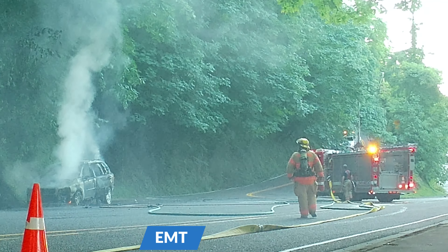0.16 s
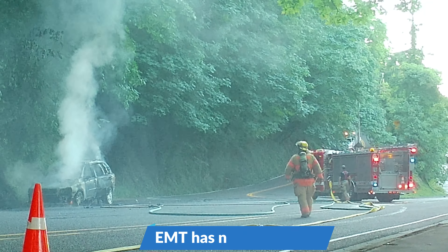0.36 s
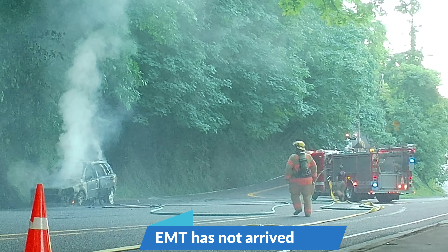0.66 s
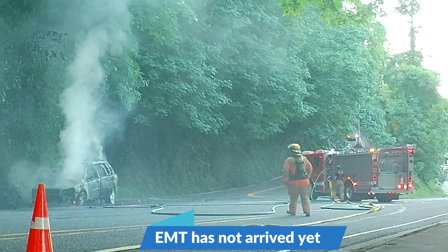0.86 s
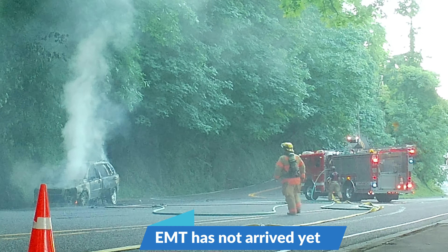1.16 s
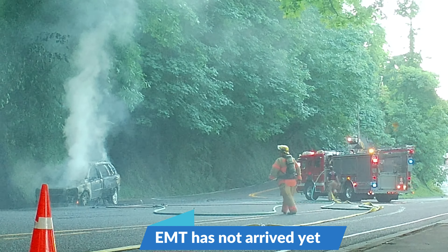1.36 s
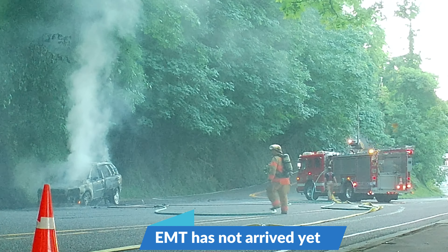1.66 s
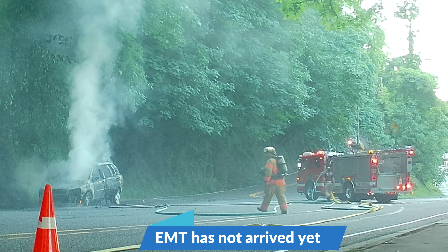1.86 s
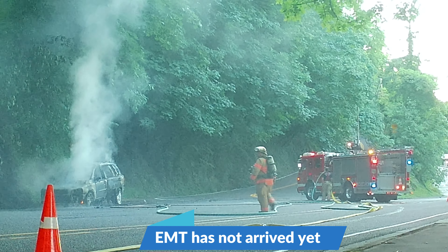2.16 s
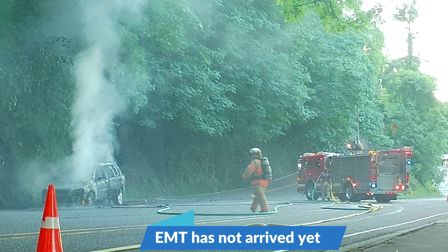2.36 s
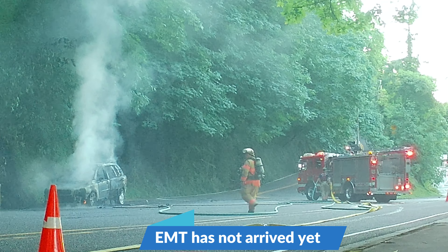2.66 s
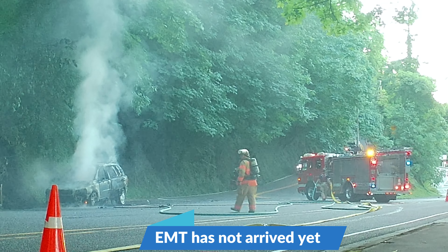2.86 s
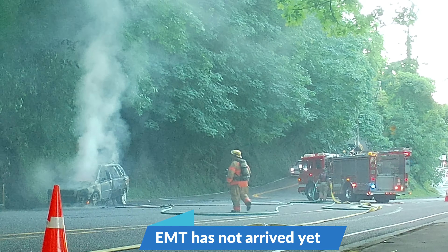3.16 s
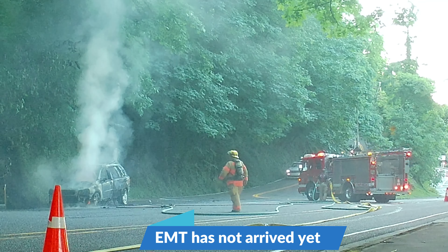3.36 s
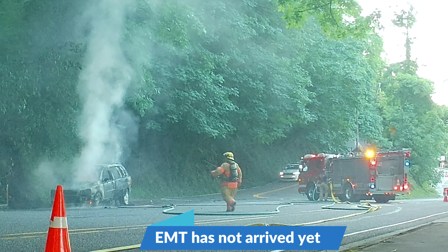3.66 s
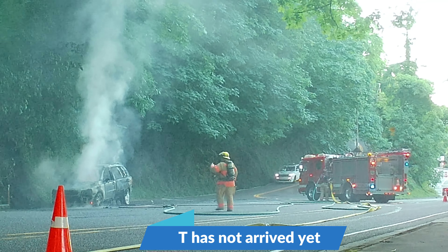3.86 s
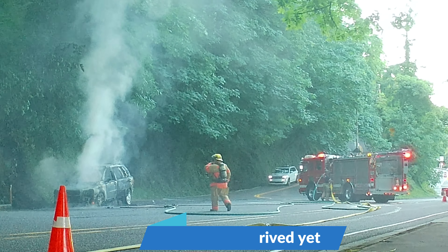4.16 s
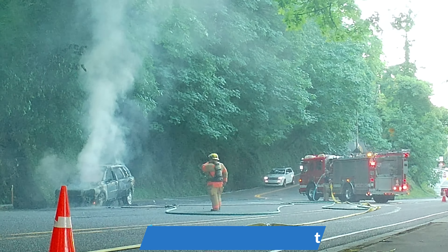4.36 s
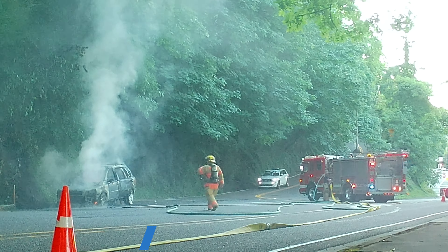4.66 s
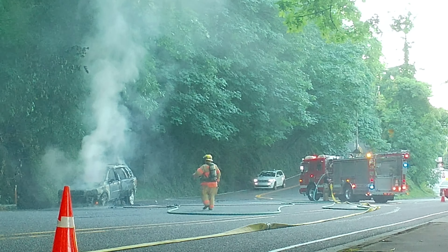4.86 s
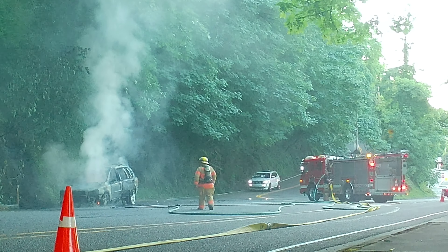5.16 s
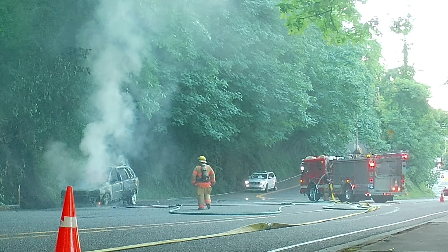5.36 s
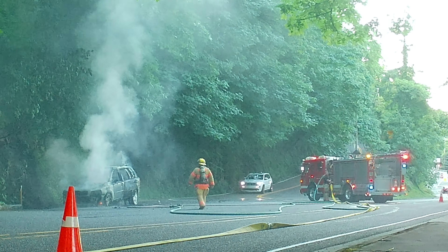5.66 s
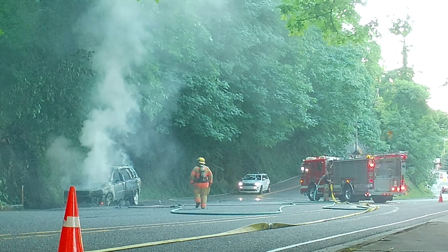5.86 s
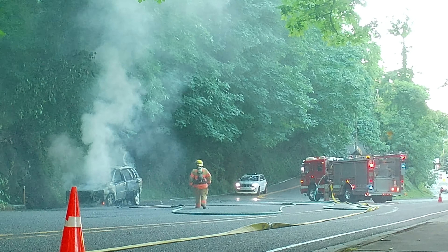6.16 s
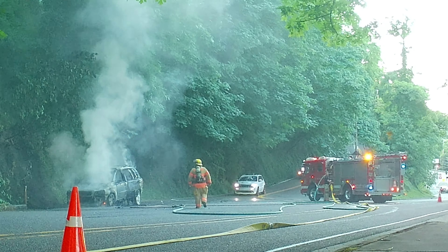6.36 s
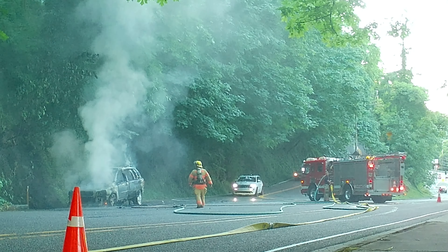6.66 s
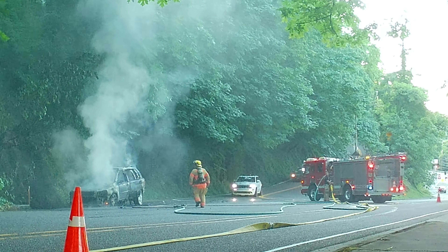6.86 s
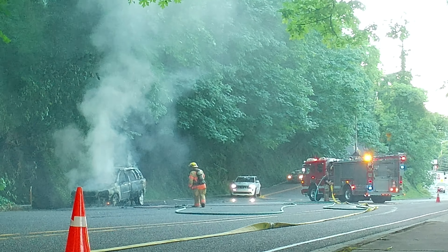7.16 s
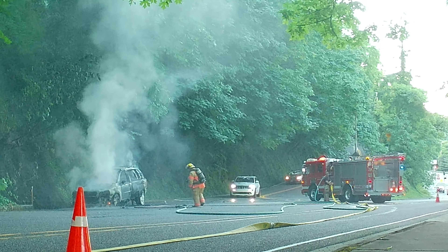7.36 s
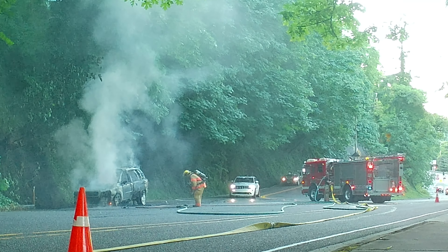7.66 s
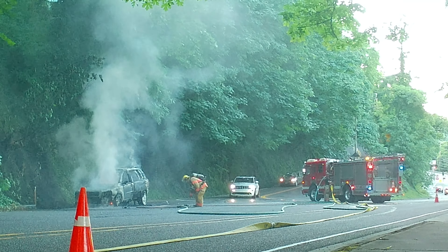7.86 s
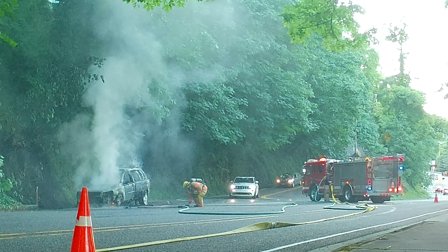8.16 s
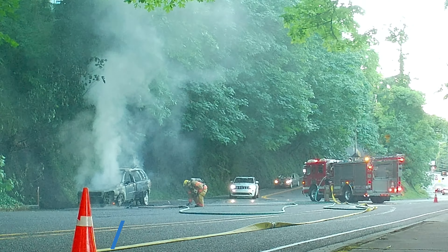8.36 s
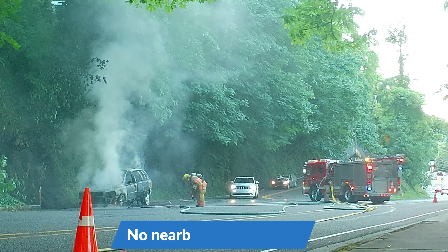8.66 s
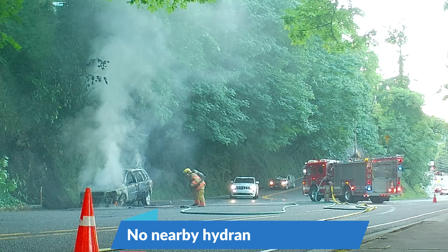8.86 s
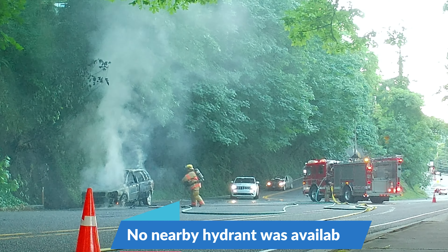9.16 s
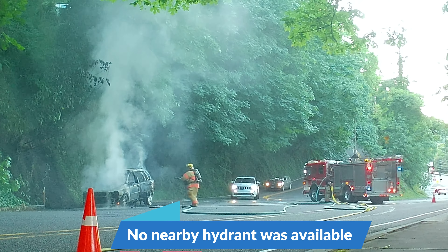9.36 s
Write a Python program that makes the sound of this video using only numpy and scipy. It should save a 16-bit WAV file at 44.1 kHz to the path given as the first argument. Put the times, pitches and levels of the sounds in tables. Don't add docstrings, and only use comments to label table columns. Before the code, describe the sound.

Low even diesel drone and soft hiss outdoors, with a truck's deep throb sinking away, a wavering small motor whine and cars pulling off.

```python
import sys
import numpy as np
from scipy import signal
from scipy.fft import rfft, irfft, next_fast_len
from scipy.io import wavfile
from scipy.ndimage import uniform_filter1d

SR = 44100
rng = np.random.default_rng(int(sys.argv[2]) if len(sys.argv) > 2 else 0)


def amplitude_ratio(level_db):
    exponent = np.asarray(level_db, float) / 20
    return 10 ** exponent


def master(y):
    cut = np.clip(np.atleast_2d(y).T, -1, 1)
    pcm = np.round(cut * 32767)
    wavfile.write(sys.argv[1], SR, pcm.astype(np.int16))


N = 419832
TIME = np.arange(N) / SR

# (time [s], crank speed [turns/s])
DIESEL_SPEED = [(0.0, 21.013), (1.5, 20.99), (3.7, 21.065), (5.2, 21.037), (8.0, 21.076), (9.52, 21.17)]
# (cycles per crank turn), then (level [dB])
MAIN_ORDERS = (3, 6, 9, 76)
MAIN_DB = (-26.5, -36.5, -37.5, -58.5)
# (cycles per crank turn), then (level [dB])
MINOR_ORDERS = (3.5, 4.5, 8, 10.5, 11, 15, 16, 17, 18, 19, 21, 24, 25, 27, 37.5, 40, 42, 45, 48, 49.5, 50.5,
                53, 54, 57, 59, 77.5, 85.5)
MINOR_DB = (-38, -38, -43, -46, -48, -48, -47, -49, -50, -53, -54, -53, -51, -53, -58, -53, -58, -55, -54,
            -57, -59, -58, -58, -61, -55, -68, -69)
# (frequency [Hz], level of one half order [dB])
CLATTER_COLOUR = [(60, -60), (300, -57), (650, -64), (1100, -63), (1350, -67), (1600, -73), (1950, -76),
                  (2200, -83), (4000, -100)]
# (time [s], firing rate [Hz], engine effort [dB])
TRUCK_PASS = [
    (0.0, 47.48, -20),
    (0.95, 47.57, 3),
    (1.35, 46.96, 0.5),
    (2.0, 46.6, 1),
    (2.6, 46.27, -9),
    (3.3, 43.7, -2),
    (4.3, 41.05, -9),
    (5.0, 36.56, -5),
    (5.4, 35.28, -23),
    (6.4, 35.18, -30),
]
# (level [dB]), then (share of the effort swing)
TRUCK_TONE_DB = (-21.5, -28, -30.5)
TRUCK_EFFORT_SHARE = (1.0, .2, .2)
# (frequency [Hz], width [Hz], boost [dB])
EXHAUST_PIPE = [(73.6, 1.6, 12), (83, 3.0, 4), (108, 7.0, -16), (129.5, 8.0, 11)]
# (frequency [Hz], level [dB per Hz])
RUMBLE_SPECTRUM = [(7.1, -45), (12, -3.5), (43, -1.5), (75, -2), (119, -5.5), (275, -13), (337, -13),
                   (427, -26.5), (490, -16), (611, -35.5), (700, -26.5), (910, -44), (1540, -120)]
# (frequency [Hz], level [dB per Hz])
HISS_SPECTRUM = [(240, -43), (400, -1.5), (439, -5), (490, -3), (615, -4.5), (1100, -10), (2180, -24.5),
                 (3000, -31), (3900, -56), (6600, -120)]
# (frequency [Hz], level [dB per Hz])
AIR_SPECTRUM = [(1500, -13), (2600, -4.5), (3300, -3), (4400, -9), (5600, -11), (6900, -12.5), (7600, -15),
                (9000, -17.5), (10500, -17), (11600, -22), (13000, -23.5), (16500, -25)]
# (time [s], level about its mean [dB])
TRAFFIC_NEARNESS = [(0.0, -5.5), (0.7, -3), (1.75, 2.5), (2.15, -2.5), (2.95, -1.5), (3.25, 0), (7.1, 0),
                    (8.0, 1), (9.0, -1.5), (9.52, 0.5)]
# (time [s], level about its mean [dB])
QUEUE_NEARNESS = [(0.0, -3), (2.6, -1.5), (3.7, 0), (6.9, 2), (7.6, 3), (8.7, 3), (9.2, 0.5), (9.52, 1.5)]
# (start [s],
# end [s], first pitch [Hz], last pitch [Hz], peak [dB])
CAR_NOTES = [(.3, 1.5, 39, 41.9, -24.5), (.3, 1.2, 318, 409.3, -33.5), (1.0, 1.6, 555, 470, -39),
             (1.3, 2.0, 490, 482, -36.5), (3.6, 4.3, 116, 112.4, -34), (4.0, 5.2, 20.3, 20.4, -29),
             (4.8, 6.4, 33.6, 36.1, -28), (6.1, 6.9, 86, 81.75, -27.5), (6.5, 7.3, 113, 115.8, -27),
             (6.8, 7.6, 126, 130.3, -24), (7.8, 8.7, 94, 99.7, -20), (7.7, 8.35, 243, 252, -29),
             (2.8, 4.5, 490.5, 491.6, -39.5), (8.6, 9.7, 72, 72.2, -24), (8.1, 8.6, 582, 560, -38),
             (8.5, 9.1, 497, 501, -39), (9.0, 9.9, 27.2, 29.2, -30), (9.0, 9.9, 126, 127, -26.5),
             (9.0, 9.9, 65, 63.6, -30), (9.1, 9.8, 450, 382, -39.5)]
# (start [s], end [s], first pitch [Hz], last pitch [Hz], peak [dB])
CAR_DRONES = [
    (1.0, 2.1, 518, 478, -35.5),
    (6.6, 7.7, 269, 240, -34.5),
    (8.3, 9.0, 214.7, 259.6, -32),
]
# (start [s], end [s], first pitch [Hz], last pitch [Hz], peak [dB])
BRAKE_SQUEALS = [
    (1.4, 2.1, 8150, 8400, -78),
    (1.7, 2.7, 8420, 7920, -72.5),
    (2.3, 2.9, 7900, 7400, -78),
    (4.6, 5.1, 8500, 8600, -78),
    (4.95, 5.8, 8190, 8400, -74.5),
    (4.95, 5.35, 7500, 7520, -77),
    (5.4, 5.85, 7410, 7370, -76),
    (8.85, 9.2, 12050, 12050, -81),
]
# (time [s], pitch [Hz], level [dB])
MOTOR_WHINE = [(1.97, 412, -39), (2.28, 343, -35), (2.47, 324, -36), (2.72, 320, -37), (3.03, 368, -35),
               (3.55, 372, -35), (4.1, 382, -33), (4.36, 369, -34), (4.6, 331, -33), (4.88, 353, -31),
               (5.22, 330, -33), (5.55, 348, -34), (5.8, 326, -35), (6.2, 338, -34.5), (7.7, 357, -34),
               (8.33, 360, -34), (8.5, 347, -28), (8.75, 322, -35)]
WHINE_INERTIA_S = 0.08
SPRAY_FROM_S, SPRAY_FULL_S, SPRAY_DB = 6.8, 9, 2.5


def rms_one(x):
    return x / np.sqrt(np.mean(x ** 2) + 1e-20)


def in_time(rows):
    seconds, *columns = np.transpose(rows)
    return [np.interp(TIME, seconds, column) for column in columns]


def at_hz(points, hz):
    point_hz, point_db = np.transpose(points)
    return np.interp(np.log(hz), np.log(point_hz), point_db)


def ramp(from_s, to_s):
    return np.clip((TIME - from_s) / (to_s - from_s), 0, 1)


def fade(rows, seconds):
    opening = TIME - rows[0][0] + seconds
    closing = rows[-1][0] + seconds - TIME
    return np.clip(np.minimum(opening, closing) / seconds, 0, 1)


def drift(rate):
    r = np.exp(-200 * np.pi * rate / SR)
    noise = rng.standard_normal(N // 100 + 1002)
    slow = signal.lfilter([1], [1, -2 * r, r * r], noise)[1000:]
    return np.interp(np.arange(N) / 100, np.arange(len(slow)), rms_one(slow - slow.mean()))


def tone(turns, level_db):
    return np.sqrt(2) * amplitude_ratio(level_db) * np.sin(2 * np.pi * (turns + rng.random()))


def banded_noise(colour, low_db, high_db, pivot_hz, patchy_db):
    size = next_fast_len(N)
    hz = np.maximum(np.arange(size // 2 + 1) * SR / size, 1)
    shaped = rfft(rng.standard_normal(size)) * amplitude_ratio(at_hz(colour, hz))
    shaped = shaped / np.sqrt(np.mean(irfft(shaped, size) ** 2))
    out = np.zeros(N)
    for centre in 2 ** np.arange(3, 14.6, 0.5):
        share = np.clip(1 - 2 * np.abs(np.log2(hz / centre)), 0, 1)
        blend = np.clip(0.5 + np.log2(centre / pivot_hz) / 2, 0, 1)
        gain_db = (1 - blend) * low_db + blend * high_db + patchy_db * drift(1.0)
        out += amplitude_ratio(gain_db) * irfft(shaped * share, size)[:N]
    return out


def diesel():
    speed, = in_time(DIESEL_SPEED)
    turns = np.cumsum(speed) / SR
    out = np.zeros(N)
    for order, db in zip(MAIN_ORDERS, MAIN_DB):
        out += tone(order * turns, db + 1.0 * drift(2.5))
    for order, db in zip(MINOR_ORDERS, MINOR_DB):
        out += tone(order * turns, db + 1.65 * drift(2.1))
    size = 4096
    half_order_hz = np.maximum(np.arange(size // 2 + 1), 1) * speed.mean() / 2
    spectrum = rfft(rng.standard_normal(size)) * amplitude_ratio(at_hz(CLATTER_COLOUR, half_order_hz))
    cycle = irfft(spectrum, size) * np.sqrt(size / 2)
    place = turns / 2 % 1 * size
    return out + np.interp(place, np.arange(size + 1), np.r_[cycle, cycle[0]])


def truck():
    firing_hz, effort_db = in_time(TRUCK_PASS)
    turns = np.cumsum(firing_hz + 0.15 * drift(3.5)) / SR
    out = np.zeros(N)
    for k, (db, share) in enumerate(zip(TRUCK_TONE_DB, TRUCK_EFFORT_SHARE), start=1):
        pipe_db = np.zeros(N)
        for hz, width, boost_db in EXHAUST_PIPE:
            pipe_db += boost_db * np.exp(-((k * firing_hz - hz) / width) ** 2)
        out += tone(k * turns, db + share * effort_db + pipe_db + 1.1 * drift(4.3))
    return fade(TRUCK_PASS, 0.24) * out


def rumble(traffic_db):
    queue_db, = in_time(QUEUE_NEARNESS)
    low_db = -20.5 - 0.21 * queue_db
    high_db = -20.5 + queue_db + 0.37 * traffic_db
    return banded_noise(RUMBLE_SPECTRUM, low_db, high_db, pivot_hz=143, patchy_db=0.87)


def hiss(traffic_db, spray_db):
    low_db = -32.0 + 1.0 * traffic_db
    high_db = -31.5 + 0.57 * traffic_db + 0.84 * spray_db
    return banded_noise(HISS_SPECTRUM, low_db, high_db, pivot_hz=1500, patchy_db=0.02)


def air(traffic_db, spray_db):
    low_db = -53.0 + 0.22 * traffic_db + spray_db
    high_db = -53.0 + 0.1 * spray_db
    return banded_noise(AIR_SPECTRUM, low_db, high_db, pivot_hz=8000, patchy_db=-0.45)


def gliding_notes(rows, rate, shake):
    out = np.zeros(N)
    for start, end, from_hz, to_hz, peak_db in rows:
        along = ramp(start, end)
        hz = (from_hz + (to_hz - from_hz) * along) * (1 + shake * drift(rate))
        out += np.sin(np.pi * along) ** 2 * tone(np.cumsum(hz) / SR, peak_db)
    return out


def car_notes():
    return gliding_notes(CAR_NOTES, rate=3.4, shake=0.007)


def car_drones():
    return gliding_notes(CAR_DRONES, rate=12, shake=0.05)


def brake_squeals():
    return gliding_notes(BRAKE_SQUEALS, rate=30, shake=0.009)


def whine():
    hz, level_db = in_time(MOTOR_WHINE)
    hz = uniform_filter1d(hz, size=int(WHINE_INERTIA_S * SR))
    unsteady_hz = 2.2 * drift(6)
    unsteady_db = 1.5 * drift(4)
    turns = np.cumsum(hz + unsteady_hz) / SR
    return fade(MOTOR_WHINE, 0.1) * tone(turns, level_db + 0.6 + unsteady_db)


def scene():
    traffic_db, = in_time(TRAFFIC_NEARNESS)
    spray_db = SPRAY_DB * ramp(SPRAY_FROM_S, SPRAY_FULL_S)
    engines = diesel() + truck()
    noises = rumble(traffic_db) + hiss(traffic_db, spray_db) + air(traffic_db, spray_db)
    cars = car_notes() + car_drones() + brake_squeals()
    return (engines + noises + cars + whine())[None]


def low_pass(x):
    return signal.sosfilt(signal.butter(12, 15745, fs=SR, output="sos"), x)


def record(dry):
    rounded = 1.3 * np.tanh(dry / 1.3)
    eased = rounded * (1 - 0.6 * ramp(TIME[-1] - 0.004, TIME[-1]))
    return low_pass(eased)


dry = scene()
out = record(dry)
master(out)
```